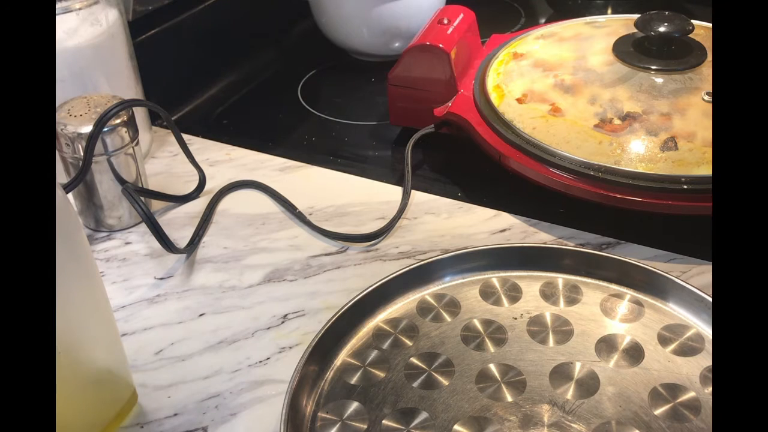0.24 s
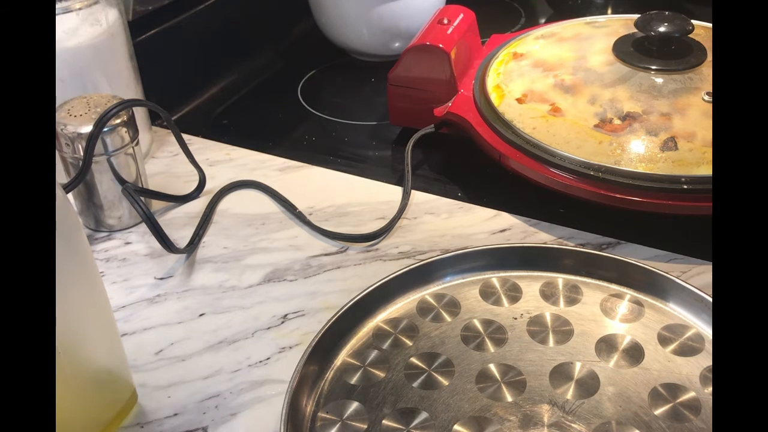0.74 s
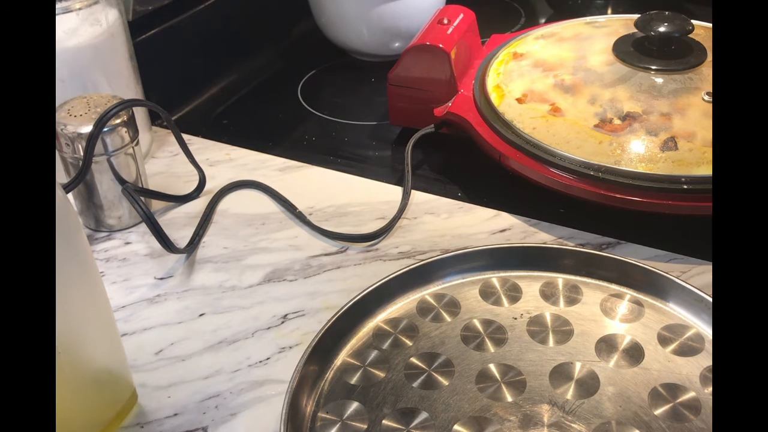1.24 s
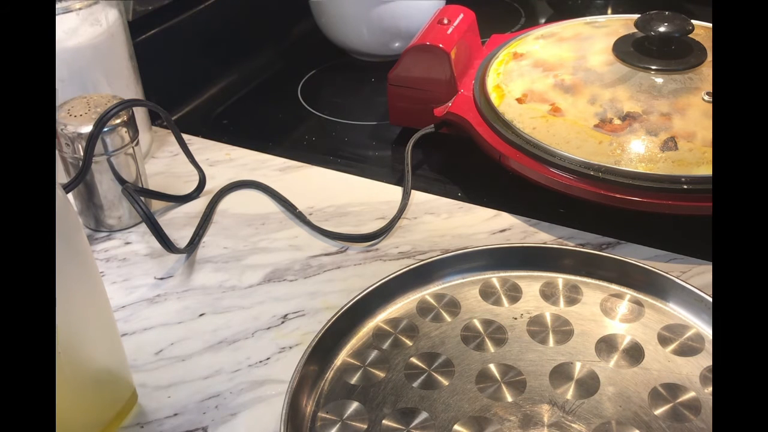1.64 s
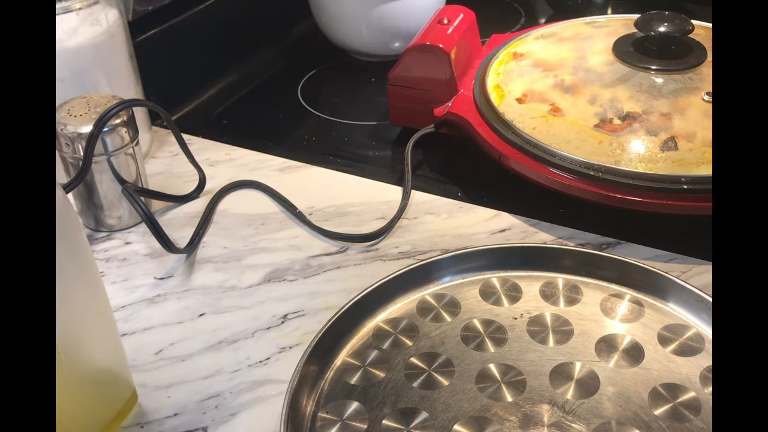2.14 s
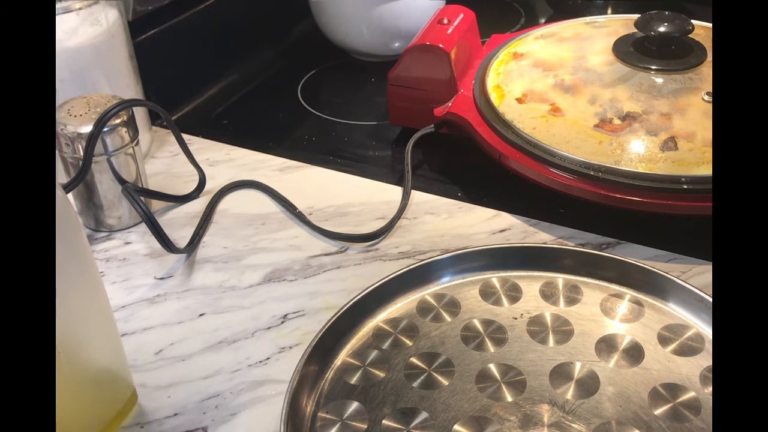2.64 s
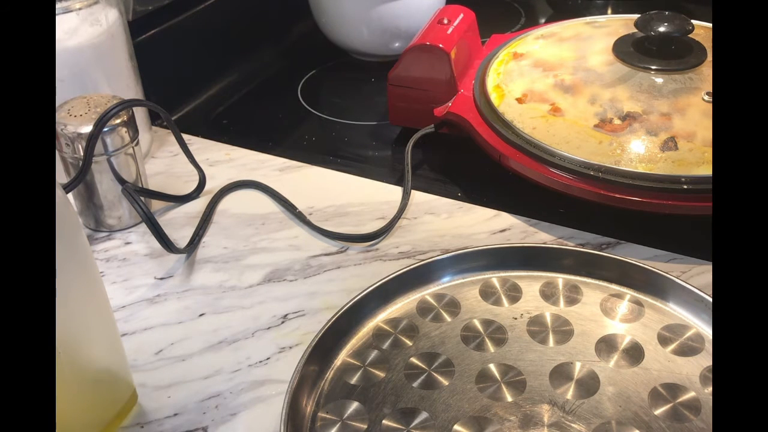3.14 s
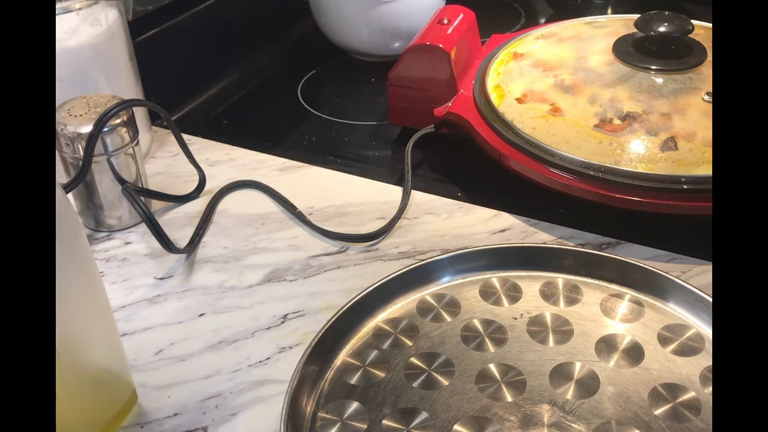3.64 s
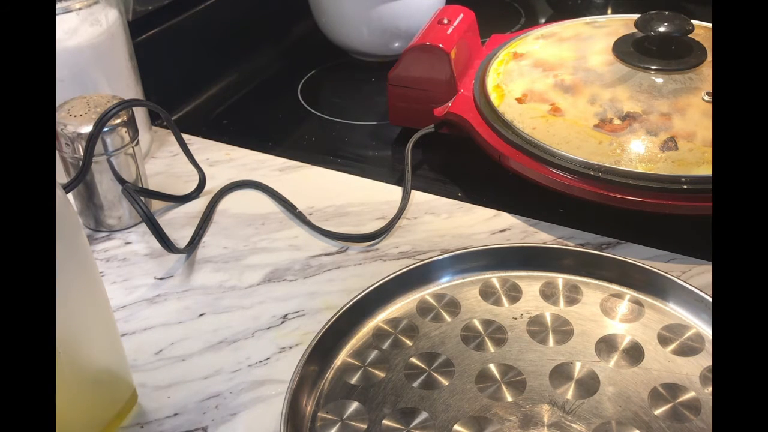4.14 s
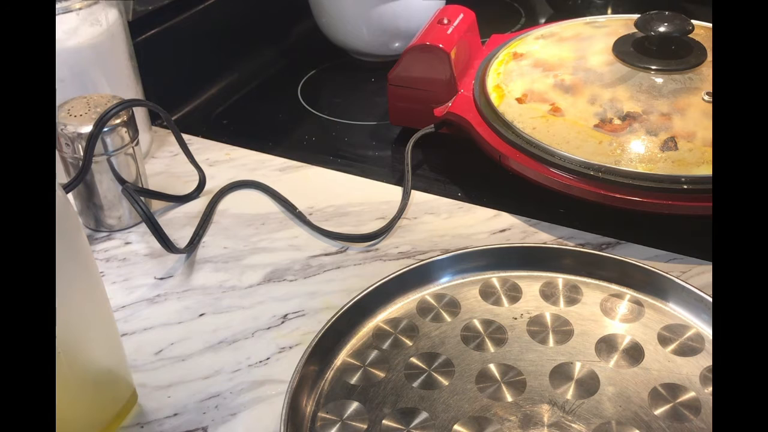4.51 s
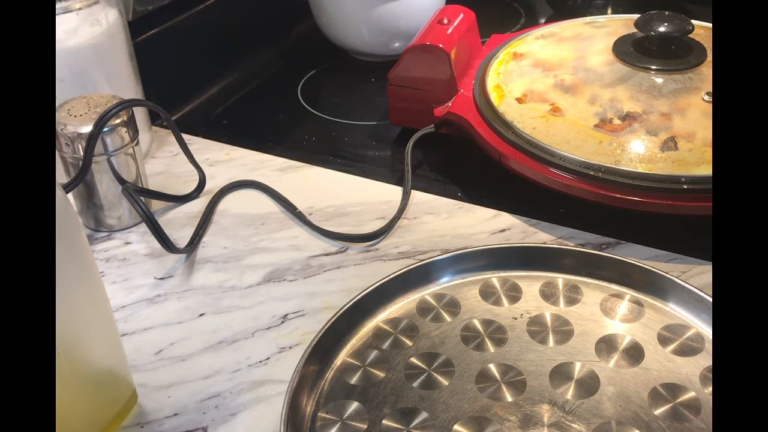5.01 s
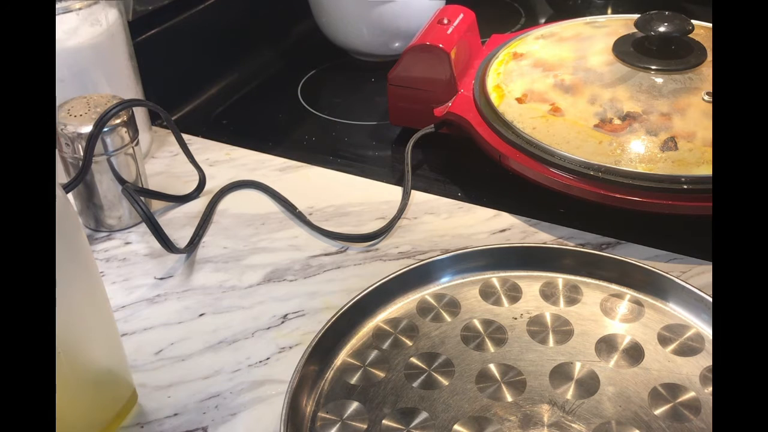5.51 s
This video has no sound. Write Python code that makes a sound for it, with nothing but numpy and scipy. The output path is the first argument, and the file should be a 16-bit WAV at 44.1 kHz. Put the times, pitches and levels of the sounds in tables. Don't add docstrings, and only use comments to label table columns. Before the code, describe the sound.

Irregular grease pops and bursts of wet sizzle under a lid in a kitchen, with tiny squeaks and a quiet steady hum beneath.

```python
import sys
import numpy as np
from scipy import signal
from scipy.fft import rfft, irfft, next_fast_len
from scipy.io import wavfile
from scipy.ndimage import uniform_filter1d

SR = 44100
rng = np.random.default_rng(int(sys.argv[2]) if len(sys.argv) > 2 else 0)


def elevation(decibels):
    levels = np.asarray(decibels, float)
    return 10 ** (levels / 20)


def log_audio(samples):
    frames = np.atleast_2d(samples).T
    limited = np.clip(frames, -1, 1)
    pcm = np.round(limited * 32767).astype(np.int16)
    wavfile.write(sys.argv[1], SR, pcm)


N = 254440

# (frequency [Hz], density [dB per Hz])
RUMBLE_SPECTRUM = [(20, -42), (33, -13), (45, -1), (70, -3), (130, -5), (200, -12.5), (240, -24.5),
                   (500, -44)]
# (frequency [Hz], density [dB per Hz])
HOUSE_SPECTRUM = [(150, -20), (300, 1), (480, -6.5), (1100, -3.5), (1600, -9.5), (4000, -8.5), (16000, -36)]
# (time [s], level [dB])
SIMMER_LEVEL = [(0.0, -56), (0.28, -56.5), (0.66, -56), (0.75, -44.5), (1.26, -45), (1.33, -79),
                (1.48, -63), (1.7, -43.5), (2.05, -62.5), (2.11, -46), (2.64, -47.5), (2.8, -46),
                (3.1, -47.5), (3.18, -58), (3.37, -45), (3.6, -51), (3.68, -68), (5.77, -69)]
# (top time [s], level [dB], 20 dB rise [s], 20 dB fall [s])
BOIL_SURGES = [(0.0, -37, .05, .19), (0.18, -25.5, .057, 0.046), (0.223, -32.5, -0.03, 0.0646),
               (0.37, -50, -0.6, 0.1), (0.42, -39.5, -0.07, 0.18), (0.72, -43, 0.12, 0.04),
               (0.911, -38, 0.04, 0.05), (1.01, -32, .07, 0.26), (1.08, -31.5, 0.16, 0.17),
               (1.51, -41, -0.27, -0.03), (1.57, -38.5, 0.03, 0.07), (1.67, -41, 0.07, -0.14),
               (1.83, -37.5, 0.13, 0.22), (2.682, -31.5, 0.05, 0.194), (3.5, -42, 0.21, 0.33),
               (3.6, -35, .15, 0.03), (3.78, -31, 0.1158, 0.124), (4.051, -29.5, 0.0235, 0.05),
               (4.13, -34.5, 0.08, .11), (4.288, -35, -0.05, 0.33), (4.39, -36.5, 0.15, 0.11),
               (4.55, -36, 0.24, 0.16), (4.9, -47.5, -0.35, 0.05), (5.0, -56, -1.2, 0.5),
               (5.208, -33, 0.05, 0.06), (5.288, -38.5, 0.01, 0.1), (5.37, -49, -0.4, .14),
               (5.489, -30.5, 0.0353, 0.07), (5.67, -39.5, .12, .3), (5.77, -36.5, 0.22, .1)]
# (time [s], low part [dB])
BOIL_WETNESS = [(0.0, 0.5), (0.75, -0.5), (0.95, -2.5), (1.5, -6), (1.75, 2), (2.11, -2.5), (2.3, 3),
                (2.65, -3), (3.2, 3), (3.55, 4), (3.8, 1.5), (4.1, 1), (4.3, 3), (4.45, 3), (4.6, 2),
                (4.9, -11.5), (5.3, 1), (5.77, -1.5)]
# (time [s], peak [dB], low part [dB], top part [dB])
DRY_CRACKS = [(.0384, -32, -2, 6.5), (.1016, -38, 3, 6), (.4998, -38, -5, -0.5), (.5337, -38, 1, 10.5),
              (.636, -35.5, -13, -5), (.9366, -17.5, -10.5, -10), (.985, -10.5, -32, -6),
              (1.0316, -20.5, -12, 0), (1.6702, -26.5, -18, -2), (1.7549, -25, -14, 4.5),
              (1.8089, -27, -8.5, -8), (1.9314, -27.5, -31.5, -5.5), (2.1078, -31, -5, -2),
              (2.1599, -26.5, -11, 2), (2.2767, -23, -21, -5), (2.347, -29.5, -5, -1),
              (2.3788, -25.5, -33.5, -5), (2.427, -41, -16, 8), (2.5313, -36.5, 3, 1),
              (2.6605, -24, -4, -3), (2.979, -34, -9, 8), (3.2808, -41.5, -1, 11.5), (3.5933, -32, -15, 10),
              (3.773, -22, -13, -15), (4.9818, -48, 4, -17), (4.9991, -36.5, -2, 3.5),
              (5.1203, -39.5, 3, 9), (5.1755, -28, -5, 3.5), (5.4463, -28.5, -6, -13)]
# (time [s], peak [dB], low part [dB], top part [dB])
FAT_SPITS = [(.084, -40, 0, 6), (.3319, -33, -18, -8), (.3645, -31, -23.5, 5), (.4126, -33.5, -9, 4),
             (.426, -32, 0, -2), (.603, -42, -2, 0), (.713, -24.5, -6.5, 12), (.8119, -26.5, -10, 2),
             (.903, -12, -30, -6.5), (1.34, -35.5, -14, -1.5), (1.487, -48, -7, -10),
             (1.5078, -39.5, -15, 7.5), (1.5158, -25.5, -15, -8), (1.5424, -30, -7, -8),
             (2.0168, -37, -23, -18), (2.092, -44, -8, -12), (2.2056, -25, -27, -5),
             (2.2645, -27.5, -13, 5), (2.3004, -28.5, -3, 3), (2.672, -29.5, -14, 11.5),
             (2.9542, -39.5, -1, -14), (3.2047, -37.5, -9, -16), (3.2663, -43, -1, 2),
             (4.3873, -21.5, -6, 2), (4.5125, -22.5, -7.5, -12.5), (4.7946, -23.5, -5.5, -10),
             (4.899, -33.5, -18, -9), (5.1894, -21.5, -17, -3), (5.4106, -37.5, -12, -5),
             (5.6362, -34.5, -15.5, -2)]
# (time [s], peak [dB], low part [dB], top part [dB])
STEAM_PUFFS = [(.122, -38, 2, 8), (.1483, -25, -11, 4), (.6636, -40, -13, -7), (.859, -35.5, -8, 5),
               (.908, -19.5, -20.5, -20), (1.3841, -42, -7, -6), (1.4312, -38, -15, -22),
               (1.5671, -27.5, -11.5, -0.5), (1.634, -35.5, -20, -23), (2.099, -39.5, 3.5, -5.5),
               (2.2283, -27.5, -28, -20), (2.4558, -37, -23.5, 5), (2.6488, -28, -13, -8),
               (2.8488, -40.5, 2, 5.5), (2.8875, -41.5, -1.5, 7), (3.3407, -37, -7, 7.5),
               (3.3637, -36.5, -3, 4), (3.497, -35.5, -6, 7.5), (3.5473, -36.5, 2, -19),
               (3.6882, -51, -8, 3), (3.706, -34.5, 1, -3), (3.996, -39.5, -5.5, 0),
               (4.0339, -40.5, 9.5, -10), (4.1135, -29.5, 3.5, 8), (4.3654, -29, -8, 6.5),
               (5.1382, -35, -1, -2), (5.356, -35, -2.5, -6), (5.4824, -32.5, 0.5, -2),
               (5.6544, -32.5, -4.5, 0), (5.726, -28.5, -20, -5.5)]
# (time [s], peak [dB])
DROPLET_TICKS = [(0.069, -29), (0.2237, -16), (0.5653, -35), (0.684, -32), (0.8445, -26), (1.0598, -24),
                 (1.2291, -27), (1.2894, -43), (1.418, -38), (1.644, -26), (1.703, -26), (1.889, -23),
                 (2.594, -28), (2.6094, -41), (2.7935, -26), (2.9198, -29.5), (3.0144, -37), (3.3209, -26),
                 (3.39, -27.5), (4.2935, -22), (4.337, -20.5), (4.4487, -27), (4.5851, -19), (4.6594, -42),
                 (4.6927, -40), (4.756, -43), (5.052, -39), (5.5294, -29), (5.5794, -38.5), (5.6138, -34)]
# (time [s], length [s], start [Hz], rise [Hz], level
# [dB])
SQUEAKS_AND_RINGS = [(3.7345, .015, 3030, 70, -19), (3.733, .012, 3260, -60, -33),
                     (3.754, .012, 3050, 70, -26), (3.772, .008, 3120, -20, -27),
                     (3.782, .019, 3100, 10, -27), (3.803, .010, 3090, -20, -31),
                     (3.814, .010, 3050, -20, -34), (4.114, .019, 1085, 10, -26),
                     (4.114, .021, 1200, 20, -27), (4.140, .006, 1200, 10, -30), (4.149, .008, 1150, 10, -32),
                     (4.372, .022, 1110, 10, -31), (4.394, .014, 1110, 10, -31), (4.036, .018, 1080, 10, -34),
                     (4.162, .016, 1130, -10, -35), (4.186, .02, 1110, -10, -38),
                     (3.706, .016, 2350, 150, -40), (2.85, .025, 1090, 10, -40)]
# (frequency [Hz], density [dB per Hz])
BURST_SPECTRUM = [(120, -23), (200, -12), (381, -4.5), (483, -10), (724, -0.5), (871, -5), (1070, -0.5),
                  (1570, -6.5), (2310, -2), (5790, 0), (9000, -3.5), (10400, -5.5), (12000, -0.5),
                  (15700, -6), (16900, -37), (17200, -37)]
# (frequency [Hz], width [Hz], level [dB])
LID_MODES = [(375, 265, -4), (756, 37, -11), (1032, 98, -3.5), (1155, 73, -16), (2490, 30, -35)]
# (frequency [Hz], t60 [s])
KITCHEN_T60 = [(300, 0.44), (1500, 0.26), (6000, 0.18), (15000, 0.15)]

HUM_HZ, HUM_DB, HOUSE_DB = 58.1, -50.5, -58
RUMBLE_DB, RUMBLE_SWELL_DB, SWELLS_PER_S = -49.5, 1.26, 1.5
LULL_S, LULL_LENGTH_S, LULL_DB = 4.67, 0.17, -7.5
SPLIT_HZ = (2000, 8000)
MEAN_BOIL_DB, LOW_PER_DB, TOP_PER_DB, TOP_DB, TOP_PER_WET = -39.5, -0.14, 0.48, -2.5, -0.02
# (level against the crack [dB], t60 [s])
CRACK_STEAM, SPIT_STEAM, PUFF_STEAM, TICK_STEAM = (-8, 0.06), (-6, 0.073), (2.3, 0.067), (-4.5, 0.037)
TICK_GAIN_DB, TICK_LOW_DB, TICK_TOP_DB = -10, -15.5, 3.5
PUFF_CRACK_DB = -5
ECHO_S, ECHO_DB, ECHO_CUT_HZ, TAIL_DB = 0.0032, -2, 6800, -5.5
SPOTS, SPOT_S = 8, 0.03
ATTACK_TOP_HZ, ATTACK_DB = 15850, 15


def rms_one(x):
    return x / np.sqrt(np.mean(x ** 2) + 1e-20)


def at_hz(points, hz):
    points_hz, values = np.transpose(points)
    return np.interp(np.log(hz + 1), np.log(points_hz), values)


def drift(rate_hz):
    r = np.exp(-2 * np.pi * rate_hz / SR)
    noise = rng.standard_normal(N + SR)
    return rms_one(signal.lfilter([1], [1, -2 * r, r * r], noise)[SR:])


def coloured(x, spectrum):
    size = next_fast_len(N + SR)
    gain = elevation(at_hz(spectrum, np.fft.rfftfreq(size, 1 / SR)))
    cepstrum = irfft(np.log(gain), size)
    cepstrum[1:size // 2] *= 2
    cepstrum[size // 2 + 1:] = 0
    return irfft(rfft(x, size) * np.exp(rfft(cepstrum)), size)[:N]


def join_parts(low, mid, top):
    bands = [(low, SPLIT_HZ[0], "low"), (-mid, SPLIT_HZ, "band"), (top, SPLIT_HZ[1], "high")]
    out = 0
    for part, edge_hz, kind in bands:
        out = out + signal.sosfilt(signal.butter(2, edge_hz, kind, fs=SR, output="sos"), part)
    return out


def background():
    t = np.arange(N) / SR
    hum = np.sqrt(2) * np.sin(2 * np.pi * HUM_HZ * t + 0.04 * drift(1.0))
    lull_db = LULL_DB * np.exp(-((t - LULL_S) / LULL_LENGTH_S) ** 2)
    rumble_db = RUMBLE_DB + RUMBLE_SWELL_DB * drift(SWELLS_PER_S) + lull_db
    rumble = rms_one(coloured(rng.standard_normal(N), RUMBLE_SPECTRUM))
    house = rms_one(coloured(rng.standard_normal(N), HOUSE_SPECTRUM))
    return elevation(HUM_DB) * hum + elevation(rumble_db) * rumble + elevation(HOUSE_DB) * house


def boil():
    t = np.arange(N) / SR
    power = elevation(2 * np.interp(t, *np.transpose(SIMMER_LEVEL)))
    for top_s, top_db, rise_s, fall_s in BOIL_SURGES:
        before = (top_s - t) / max(rise_s, 0.005)
        after = (t - top_s) / max(fall_s, 0.005)
        power += elevation(2 * (top_db - 20 * np.where(t < top_s, before, after)))
    return 10 * np.log10(power), np.interp(t, *np.transpose(BOIL_WETNESS))


def sizzle(per_s, spread_db, clump_db, hiss_db):
    level_db, wet_db = boil()
    level_db = uniform_filter1d(level_db, size=900)
    fierce_db = level_db - MEAN_BOIL_DB
    low_db = wet_db + LOW_PER_DB * fierce_db
    top_db = TOP_DB + TOP_PER_WET * wet_db + TOP_PER_DB * fierce_db
    sizes = elevation(spread_db * np.minimum(rng.exponential(1, N), 2.6)) * rng.choice([-1, 1], N)
    bursts = rms_one(sizes * (rng.random(N) < per_s / SR))
    grains = bursts + elevation(hiss_db) * rng.standard_normal(N)
    grains = grains * elevation(level_db + clump_db * np.tanh(drift(71)))
    return join_parts(grains * elevation(low_db), grains, grains * elevation(top_db))


def pops(crack_s, puff_rise_s):
    t = np.arange(SR // 5) / SR
    parts = np.zeros((3, N + len(t)))
    crack = 0.75 * np.exp(-(t / crack_s) ** 2)
    ticks = [(s, db + TICK_GAIN_DB, TICK_LOW_DB, TICK_TOP_DB) for s, db in DROPLET_TICKS]
    kinds = [(DRY_CRACKS, CRACK_STEAM, 0), (FAT_SPITS, SPIT_STEAM, 0),
             (STEAM_PUFFS, PUFF_STEAM, PUFF_CRACK_DB), (ticks, TICK_STEAM, 0)]
    for bursts, (steam_db, steam_t60_s), crack_db in kinds:
        puff = elevation(steam_db - 7 - 60 * t / steam_t60_s) * (1 - np.exp(-t / puff_rise_s))
        for s, peak_db, low_db, top_db in bursts:
            sharp, soft = rng.standard_normal((2, len(t)))
            burst = np.tanh(sharp) * crack * elevation(crack_db) + soft * puff
            tilt_db = np.array([[low_db + 10], [0], [top_db + 3]])
            at = round(s * SR)
            parts[:, at:at + len(t)] += burst * elevation(peak_db + tilt_db)
    return join_parts(*parts[:, :N])


def squeaks():
    out = np.zeros(N)
    for s, length_s, start_hz, rise_hz, level_db in SQUEAKS_AND_RINGS:
        share = np.linspace(0, 1, round(length_s * SR))
        phase = 2 * np.pi * np.cumsum(start_hz + rise_hz * share) / SR
        at = round(s * SR)
        out[at:at + len(share)] += elevation(level_db) * np.sin(np.pi * share) ** 0.37 * np.sin(phase)
    return out


def resonance(x, hz, width_hz):
    r = np.exp(-np.pi * width_hz / SR)
    zeros = np.array([1, 0, -1]) * (1 - r * r) / 2
    return signal.lfilter(zeros, [1, -2 * r * np.cos(2 * np.pi * hz / SR), r * r], x)


def under_lid(x):
    x = coloured(x, BURST_SPECTRUM)
    return x + sum(elevation(db) * resonance(x, hz, width_hz) for hz, width_hz, db in LID_MODES)


def tail():
    t = np.arange(SR // 3) / SR
    edges_hz = 150 * 2 ** np.arange(0, 7.1, 0.5)
    out = np.zeros(len(t))
    for low_hz, high_hz in zip(edges_hz, edges_hz[1:]):
        sos = signal.butter(2, [low_hz, high_hz], "band", fs=SR, output="sos")
        band = signal.sosfilt(sos, rng.standard_normal(len(t)))
        out += band * elevation(-60 * t / at_hz(KITCHEN_T60, np.sqrt(low_hz * high_hz)))
    out *= 1 - np.exp(-t / 0.0089)
    return out / np.linalg.norm(out)


def kitchen(x):
    steps = np.arange(N) / (SPOT_S * SR)
    spot = rng.integers(0, SPOTS, int(steps[-1]) + 2)
    lags_s = ECHO_S * rng.uniform(0.85, 1.2, SPOTS)
    dull = signal.butter(1, ECHO_CUT_HZ, fs=SR, output="sos")
    out = x.copy()
    for k, lag_s in enumerate(lags_s):
        here = x * np.interp(steps, np.arange(len(spot)), spot == k)
        echo = signal.sosfilt(dull, np.pad(here, (round(lag_s * SR), 0))[:N])
        out += elevation(ECHO_DB) * echo
        out += elevation(TAIL_DB) * signal.fftconvolve(here, tail())[:N]
    return out


def scene():
    room_noise = background()
    frying = sizzle(per_s=5000, spread_db=3.5, clump_db=4.0, hiss_db=-4.5)
    frying = frying + elevation(7.5) * pops(crack_s=0.0012, puff_rise_s=0.003)
    squeak = squeaks()
    return (kitchen(under_lid(frying) + 0.49 * squeak) + 0.69 * squeak + room_noise)[None]


def top_cut(x):
    return signal.sosfilt(signal.butter(12, 17010, fs=SR, output="sos"), x)


def record(dry):
    top = irfft(rfft(dry) * (np.fft.rfftfreq(N, 1 / SR) > ATTACK_TOP_HZ), N)
    power = np.diff(dry, prepend=0) ** 2
    before = np.roll(uniform_filter1d(power, size=600), shift=360)
    attack = uniform_filter1d(power, size=100) > elevation(ATTACK_DB) ** 2 * before
    gate = np.minimum(1, 200 * uniform_filter1d(attack * 1.0, size=300))
    gate = uniform_filter1d(gate, size=100)
    return top_cut(dry - top * (1 - gate))


dry = scene()
out = record(dry)
log_audio(out)
```